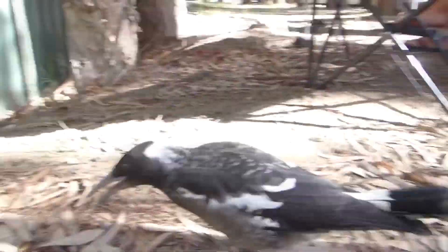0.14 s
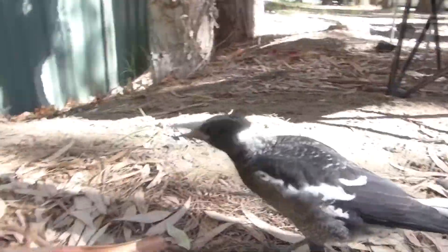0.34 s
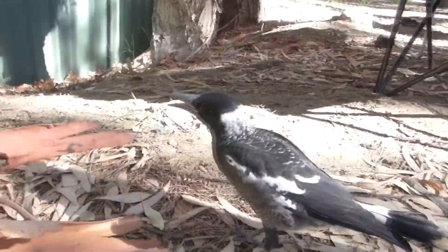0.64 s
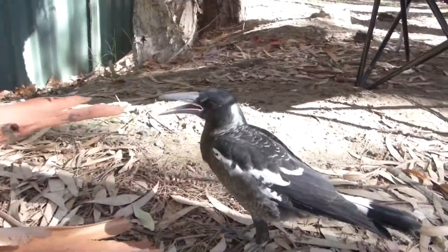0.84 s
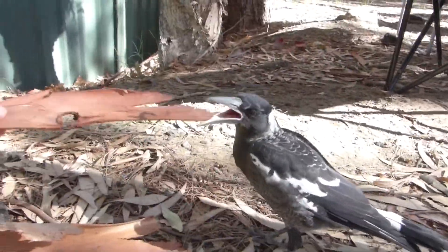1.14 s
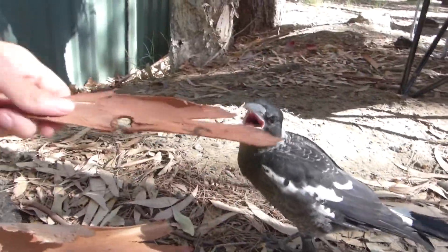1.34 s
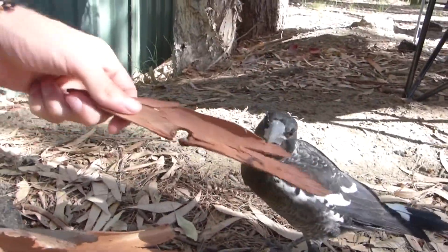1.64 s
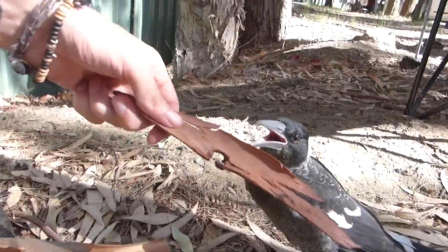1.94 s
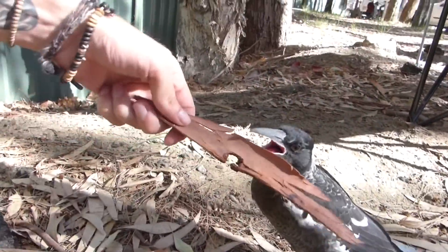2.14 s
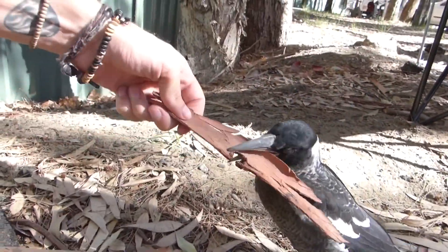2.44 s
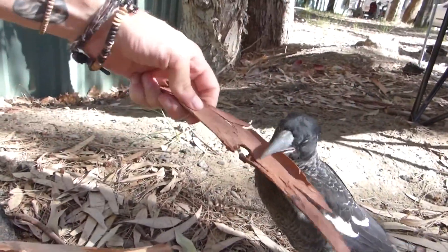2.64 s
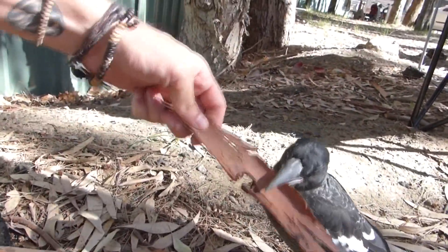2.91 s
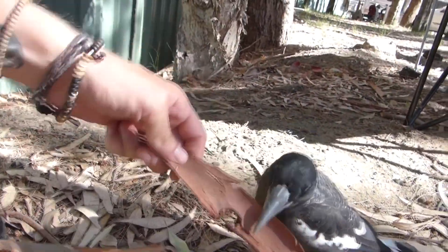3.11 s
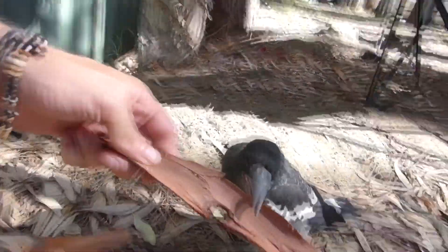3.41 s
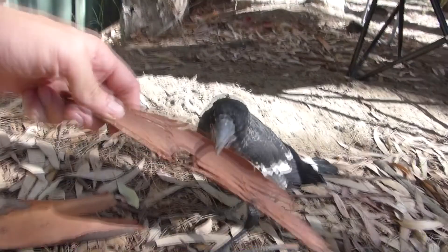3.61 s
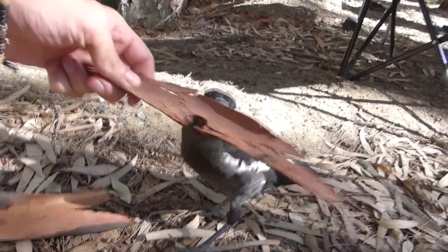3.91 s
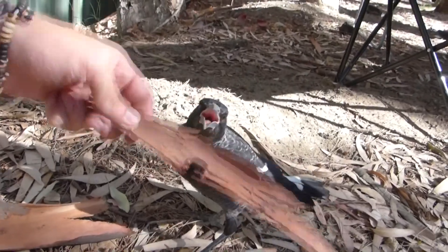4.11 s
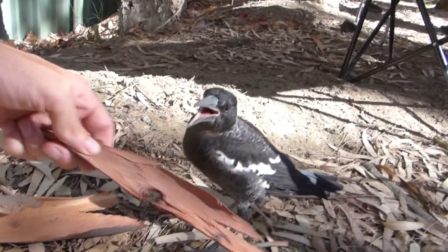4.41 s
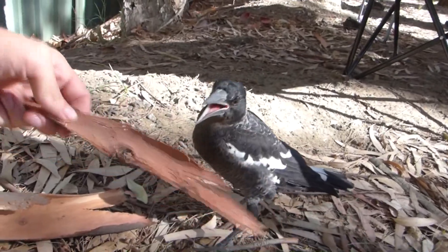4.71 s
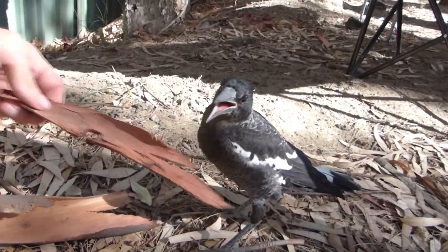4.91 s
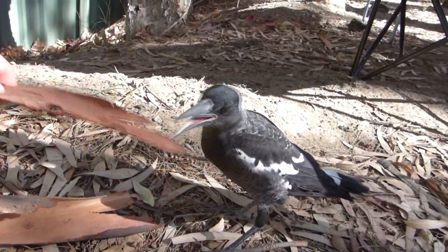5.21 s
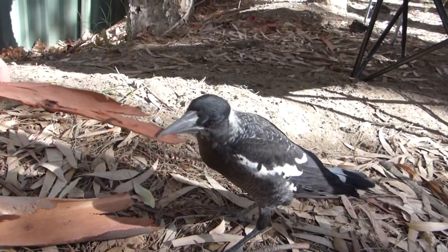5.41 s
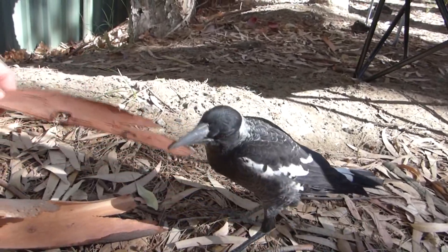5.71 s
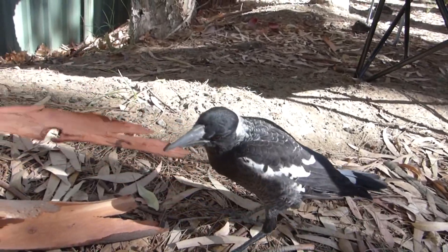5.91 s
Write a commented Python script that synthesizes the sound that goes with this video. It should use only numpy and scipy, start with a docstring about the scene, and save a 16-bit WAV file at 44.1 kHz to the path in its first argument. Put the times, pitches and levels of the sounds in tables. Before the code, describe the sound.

A young magpie gives eight hoarse, whining squawks over crackling dry leaves, with bark scrapes, beak snaps and rough close rubbing midway.

```python
"""Dry leaf litter crackles and stirs over a quiet outdoor hum, then a young magpie squawks eight times
at a strip of bark held out to it. Each squawk starts as a hoarse rasp and may clear into a bright harmonic
tone: chaotic pulses and puffs through the windpipe give way to summed harmonics. Bark scrapes over feathers
in short friction noises, the beak snaps in sharp bursts from midway on, and soon after the first snaps
uneven slips make a rough rubbing close by. Leaf cracks recur until just before the seventh squawk."""
import sys
import numpy as np
from scipy import signal
from scipy.fft import rfft, irfft, next_fast_len
from scipy.io import wavfile
from scipy.ndimage import uniform_filter1d, map_coordinates

SR = 44100
rng = np.random.default_rng(int(sys.argv[2]) if len(sys.argv) > 2 else 0)


def log_audio(samples):
    """Write samples as a 16-bit WAV file to the path given in sys.argv[1]."""
    # one column per channel
    frames = np.atleast_2d(samples).T
    # limit to full scale, then quantise
    limited = np.clip(frames, -1, 1)
    pcm = np.round(limited * 32767).astype(np.int16)
    wavfile.write(sys.argv[1], SR, pcm)


N = 266981
TIME = np.arange(N) / SR
EARS = np.array([[1], [-1]])   # left, right


def from_db(db):
    """Decibels to gain."""
    return 10 ** (np.asarray(db) / 20)


def rms_one(x):
    """Scale to unit power."""
    return x / np.sqrt(np.mean(x ** 2) + 1e-20)


def gate(t, start, end, edge):
    """Open from start to end, with short ramps."""
    opening = np.clip((t - start) / edge + .5, 0, 1)
    return opening * np.clip((end - t) / edge + .5, 0, 1)


def ease(x):
    """A smooth step from 0 to 1."""
    return np.sin(np.pi / 2 * np.clip(x, 0, 1)) ** 2


def swell(t, s, rise, fade):
    """A bell-shaped swell that peaks at s."""
    return np.exp(-np.minimum(((t - s) / np.where(t < s, rise, fade)) ** 2, 40))


def strokes(rows):
    """Overlapping swells (peak_s, level_db, rise_s, fade_s) add up in power."""
    return np.sqrt(sum((from_db(db) * swell(TIME, s, rise, fade)) ** 2 for s, db, rise, fade in rows))


def band(x, low_hz, high_hz, order=2):
    """Butterworth band-pass, its edges kept inside the audible range and below half the sample rate."""
    edges = [max(low_hz, 20), min(high_hz, SR / 2 - 500)]
    return signal.sosfilt(signal.butter(order, edges, "band", fs=SR, output="sos"), x)


def colour(x, spectrum):
    """Shape a sound with a spectrum drawn smoothly over log frequency."""
    hz, db = np.transpose(spectrum)
    size = next_fast_len(x.shape[-1])
    log_hz = np.log(np.arange(size // 2 + 1) * SR / size + 1)
    gain = from_db(np.interp(log_hz, np.log(hz), db))
    return irfft(rfft(x, size) * gain, size)[..., :x.shape[-1]]


def resonate(x, hz, width):
    """One resonance with gain 1 on top."""
    r = np.exp(-np.pi * width / SR)
    feedback = [1, -2 * r * np.cos(2 * np.pi * hz / SR), r * r]
    return signal.lfilter(np.array([1, 0, -1]) * (1 - r * r) / 2, feedback, x)


def wander(rate, t):
    """Smooth chance of unit power that changes about rate times a second."""
    since = t - t[0]
    knots = rng.standard_normal(int(since[-1] * rate) + 4)
    return rms_one(map_coordinates(knots, [since * rate + 1], order=2, mode="nearest"))


def stereo_noise(width, size=N):
    """White noise with some difference between the ears."""
    mid, side = rng.standard_normal((2, size))
    return mid + width * side * EARS


def level_of(x):
    """Running rms over 15 ms."""
    return np.sqrt(np.abs(uniform_filter1d(x * x, int(.015 * SR))) + 1e-12)


def background(air_db=-47.5, hum_db=-2):
    """Faint open-air noise, alike in both ears in the bass, and a far wavering hum of steady-level tones."""
    # open-air spectrum: hz, relative density_db
    air_spectrum = [(18, -64), (30, -25), (58, -24), (79, -16), (124, -1.5), (157, -5), (194, -1),
                    (499, -11), (540, -6.5), (600, -8), (1590, -15), (2120, -23), (6900, -24.5),
                    (7870, -22.5), (16000, -37.5)]
    # hum tones: pitch_hz, level_db before the common hum gain
    hum_tones = [(94, -60.5), (119, -60.5), (188, -57)]
    mid, side = rng.standard_normal((2, N))
    air = rms_one(colour(mid + 0.8 * band(side, 300, 18000) * EARS, air_spectrum))
    hum = 0
    for hz, db in hum_tones:
        phase = 2 * np.pi * hz * TIME + 2.2 * wander(9.1, TIME)
        hum = hum + from_db(db) * np.sqrt(2) * np.cos(phase)
    return from_db(air_db) * air + from_db(hum_db) * hum


def outdoors(x, echo_db=-25, decay_s=0.034):
    """Trunks, ground and a shed wall scatter a faint short echo, different in each ear."""
    t = TIME[:SR // 3]
    scatter = band(rng.standard_normal((2, len(t))), 510, 5100, order=1)
    scatter = scatter * np.exp(-t / decay_s) * (t > .002)
    scatter = scatter / np.sqrt(np.sum(scatter ** 2) / 2)
    return x + from_db(echo_db) * signal.fftconvolve(x, scatter, axes=1)[:, :N]


def litter(grain_db=2.5, gain_db=-1.5):
    """Clumps of tiny crackles as the leaves shift: noise in wildly uneven grains."""
    # litter stirred by feet and bark: peak_s, level_db before gain_db, rise_s, fade_s
    stirs = [(0.015, -39.5, 0.041, 0.3), (0.195, -38, 0.0045, 0.15), (0.835, -37, 0.0045, 0.041),
             (1.035, -41, 0.13, 0.04), (3.89, -45.5, 0.12, 0.33), (4.026, -32, 0.058, 0.011)]
    # spectrum of the leaves: hz, relative density_db
    leaf_spectrum = [(240, -28), (400, -1), (543, -31), (595, -17), (663, 4.5), (1240, -1.5), (1450, -8),
                     (1710, 1.5), (2550, -2.5), (5310, 5), (8930, 3), (15500, -12)]
    unevenness_db = grain_db * wander(540, TIME) + 0.5 * wander(78, TIME)
    grains = stereo_noise(0.54) * from_db(unevenness_db)
    return from_db(gain_db) * strokes(stirs) * rms_one(colour(grains, leaf_spectrum))


def cracks(decay_s=0.0043, spread=1.11):
    """A dry leaf breaks with a brief burst around its own pitch."""
    # breaking leaves: start_s, level_db of the burst at its start before the final filter, centre_hz
    breaks = [(0.085, -37, 5310), (0.191, -29.5, 4050), (0.2237, -29.5, 5400), (0.277, -39, 5450),
              (0.296, -35, 5390), (0.6004, -49, 2380), (0.8095, -37.5, 1930), (0.834, -43.5, 5280),
              (0.8544, -38, 3100), (0.891, -35, 7600), (1.6886, -41, 8040), (1.7365, -38.5, 7850),
              (1.754, -36.5, 8100), (3.1642, -36, 4000), (3.9714, -30, 4850), (4.189, -43, 7760),
              (4.773, -43, 6300)]
    out, t = np.zeros((2, N)), TIME[:SR // 20]
    for s, db, hz in breaks:
        burst = rms_one(band(stereo_noise(0.33, size=len(t)), hz / spread, hz * spread, order=1))
        first = int(s * SR)
        out[:, first:first + len(t)] += from_db(db) * burst * np.exp(-t / decay_s)
    return band(out, 900, 11600, order=3)


def scrapes(grain_db=3.5):
    """Each stroke swells and fades, a grainy friction noise around one pitch."""
    # short scrapes and scuffs: peak_s, length_s from the peak to 1/e^2, level_db of the band,
    # centre_hz, width_hz
    scuffs = [(0.098, 0.047, -43.5, 1290, 1150), (1.008, 0.057, -40, 3400, 974),
              (0.993, 0.17, -47, 523, 302), (1.097, 0.072, -28.5, 816, 169),
              (1.108, 0.069, -32.5, 1500, 400), (1.816, 0.025, -49, 8360, 1800),
              (1.88, 0.021, -43.5, 8300, 2600), (2.713, 0.039, -40, 6400, 7450),
              (2.865, 0.035, -34, 9610, 1400), (3.324, 0.038, -37, 8200, 1000),
              (3.387, 0.03, -33.5, 7700, 1800), (3.436, 0.033, -31, 5400, 6000),
              (3.449, 0.013, -26, 6900, 1000), (3.544, 0.034, -29.5, 7200, 1600),
              (3.604, 0.017, -29.5, 7200, 1400), (3.716, 0.024, -24.5, 6700, 910),
              (3.937, 0.11, -44.5, 990, 610)]
    out, friction = 0, stereo_noise(0.32) * from_db(grain_db * wander(500, TIME))
    for s, length, db, hz, width in scuffs:
        envelope = np.exp(-2 * np.minimum(((TIME - s) / length) ** 2, 20))
        core = rms_one(band(friction, hz - width / 2, hz + width / 2) + 0.22 * resonate(friction, hz, 2 * width))
        out = out + from_db(db) * envelope * core
    return out


def rub(slip_db=2.0, body_gain_db=3, hiss_gain_db=2, pan_db=4):
    """Uneven slips drive a hollow low flutter and a thin hiss, close by and a little to the left."""
    # rubbing strokes: peak_s, flutter level_db and hiss level_db (both before their gains), rise_s, fade_s
    rubbing = [(2.959, -33, -38.5, 0.067, 0.17), (2.958, -36, -47, 0.013, 0.013),
               (3.15, -40, -45, 0.045, 0.25), (3.4, -38.5, -46.5, 0.075, .03)]
    # resonances of the hollow flutter: centre_hz, width_hz, relative level_db
    body_modes = [(194, 53, -5), (464, 115, 1), (750, 124, 5.5)]
    # resonances of the hiss: centre_hz, width_hz before the two stages widen it, relative level_db
    hiss_modes = [(3910, 650, 3.5), (6750, 210, -3), (8200, 330, -3), (10700, 990, 1.5)]
    body_level = strokes((s, db + body_gain_db, rise, fade) for s, db, _, rise, fade in rubbing)
    hiss_level = strokes((s, db + hiss_gain_db, rise, fade) for s, _, db, rise, fade in rubbing)
    slips = stereo_noise(0.1) * from_db(slip_db * wander(130, TIME))
    body = sum(from_db(db) * resonate(slips, hz, width) for hz, width, db in body_modes)
    body = rms_one(band(body, 160, 890, order=3))
    hiss = 0
    for hz, width, db in hiss_modes:
        hiss = hiss + from_db(db) * resonate(resonate(slips, hz, 1.4 * width), hz, 1.3 * width)
    return (body_level * body + hiss_level * rms_one(hiss)) * from_db(pan_db / 2 * EARS)


def snaps(decay_s=0.0015, tail_decay_s=0.024, tail_db=-20, gain_db=1):
    """A hard contact of beak or bark: one sharp burst and a short tail."""
    # beak snaps and knocks on the bark: start_s, level_db before gain_db and the final filter
    contacts = [(2.61, -29), (2.705, -19.5), (3.395, -34), (4.023, -23)]
    # spectrum of a contact: hz, relative density_db
    contact_spectrum = [(180, -51), (300, -35.5), (577, -4), (1400, 0.5), (1730, -2), (3020, -6.5),
                        (3270, -18), (4620, 0.5), (6000, -19), (8460, -20), (8880, -10.5), (11700, -21),
                        (15000, -56.5)]
    out, t = np.zeros(N), TIME[:SR // 10]
    envelope = np.exp(-t / decay_s) + from_db(tail_db) * np.exp(-t / tail_decay_s)
    for s, db in contacts:
        burst = rms_one(colour(rng.standard_normal(len(t)), contact_spectrum)) * envelope
        first = int(s * SR)
        out[first:first + len(t)] += from_db(db + gain_db) * burst
    return band(out, 470, 11500)


def windpipe(x, resonances, neck, t, width_hz=300, widening=0.062, leak_db=-26, sway_db=2.0):
    """Side-by-side resonances with deep valleys between them; they slide with the neck and sway a little."""
    out = from_db(leak_db) * band(x, 7900, 11300)
    turns = np.cumsum(neck * (1 + .008 * wander(21.4, t))) / SR   # random sway of all resonances
    for hz, db in resonances:
        r = np.exp(-np.pi * (width_hz + widening * hz) / SR)
        centre = np.exp(2j * np.pi * hz * turns)
        # a double low-pass around the moving centre is a steep resonance
        ring = np.real(centre * signal.lfilter([(1 - r) ** 2], [1, -2 * r, r * r], x / centre))
        out = out + from_db(db + sway_db * wander(29.2, t)) * 2 * ring
    return band(out, 580, 25300, order=3)


def gesture(row, t, rise_shape=.75):
    """One squawk's course: pitch climbs, sags and drops, the rasp settles, the level swells and is released."""
    # the effort surges or eases: peak_s, half_length_s, pitch lift_hz, overtone gain_db,
    # resonance shift (added to the neck factor)
    pushes = [(0.405, 0.034, 0.5, 8, -0.023), (1.026, 0.0074, 0, -5.5, -0.021), (1.25, .06, 0.5, 2, 0.029),
              (1.337, 0.036, -0.5, 3, -0.029), (1.572, 0.11, 78.5, 0, -0.057),
              (2.143, 0.064, 56.5, -1.5, 0.011), (2.387, 0.074, -0.5, 6, 0.016), (2.741, 0.031, 0.5, -8, 0),
              (3.553, 0.066, -1.5, 4, -0.0041), (3.658, 0.0242, -11, -4.5, -0.052),
              (5.718, 0.026, -28.5, 3, -0.0086), (5.77, 0.036, 18.5, 1.5, 0.035),
              (5.866, 0.011, -2, 4.5, 0.012)]
    # the syrinx locks into a clearer tone: from_s, to_s, roughness (0-1), overtone gain_db
    clear_spells = [(1.18, 1.363, 0.43, 0.5), (1.497, 1.604, 0.05, -2), (2.336, 2.539, 0.04, -0.5),
                    (2.71, 2.863, 0.6, 2), (3.621, 3.9, 0.49, 0), (4.597, 4.74, 0.18, -2)]
    sag_hz_per_s, drop_s = 110, .04   # sag after the top, fall at the very end
    onset_roughness, lock_s = 0.94, 0.045   # lock_s: time to lock or let go
    attack_s, release_s, release_db = .004, 0.081, 20
    fundamental_db_per_octave = 12.5   # a higher fundamental carries better
    (start, end, first_hz, top_hz, rise, drop_hz, base_db, base_slope, throat_db, bright_db, slope,
     settled, settling, neck, slide, _) = row
    age, left, from_middle = t - start, end - t, t - (start + end) / 2

    pitch = first_hz + (top_hz - first_hz) * ease(age / rise) ** rise_shape
    pitch = pitch - sag_hz_per_s * np.maximum(age - rise, 0)
    pitch = pitch - drop_hz * np.clip(1 - left / drop_s, 0, 1)
    rough = onset_roughness + (settled - onset_roughness) * ease(age / settling)
    overtone_db = slope * from_middle
    neck = neck + slide * from_middle
    for s, length, lift_hz, db, shift in pushes:
        push = swell(t, s, length, length)
        pitch = pitch + lift_hz * push
        overtone_db = overtone_db + db * push
        neck = neck + shift * push
    for begin, finish, locked_rough, db in clear_spells:
        locked = gate(t, begin, finish, lock_s)
        rough = rough + (locked_rough - rough) * locked
        overtone_db = overtone_db + db * locked

    base_db = base_db + base_slope * from_middle + fundamental_db_per_octave * np.log2(pitch / top_hz)
    fade_db = release_db * np.clip(1 - left / release_s, 0, 1) ** 2
    envelope = gate(t, start, end, attack_s) * from_db(-fade_db)
    levels = envelope * from_db([base_db, throat_db + overtone_db, bright_db + overtone_db])
    return pitch, np.clip(rough, 0, 1), neck, levels


def squawk(row, tone, resonances, t, jitter=0.19, flutter=0.15, half_lines=0.43, rattle_db=3.0,
           waver=0.0097, clear_below=0.604, base_gain_db=1.0, smear=0.86):
    """The syrinx sings a clear tone, or beats chaotically and drives the windpipe with uneven pulses and puffs."""
    pitch, rough, neck, (base_level, throat_level, bright_level) = gesture(row, t)
    # some pitch waver (the .22) is left even in a clear tone
    wavering_pitch = pitch * (1 + waver * (rough + .22) * wander(112.8, t))
    phase = 2 * np.pi * np.cumsum(wavering_pitch) / SR
    phase = phase + jitter * rough * wander(600, t)   # early and late cycles smear high harmonics most
    phase = phase + smear * rough ** 4 * wander(111, t)   # in a full rasp the pitch itself breaks up
    strength = 1 + flutter * rough * wander(450, t)
    # the fundamental is left out here and added below at its own level
    clear = rms_one(sum(from_db(db) * np.cos(round(k) * phase + k * k / 2) for k, db in tone if k > 1.5))
    # strong and weak pulses alternate in fits, which puts lines between the harmonics
    pulses = rms_one(sum(np.cos(k * phase) for k in range(2, 19)))
    pulses = pulses * (1 + half_lines * (1 + 1.2 * wander(88.7, t)) * np.cos(phase / 2))
    # air escapes in a puff each cycle, in rattling bunches
    puffs = rng.standard_normal(len(t)) * (1 + 0.37 * np.cos(phase))
    puffs = rms_one(puffs * from_db(rattle_db * wander(420, t)))
    drive = np.sqrt(1 - rough ** 2) * strength * pulses + rough * puffs
    hoarse = rms_one(windpipe(drive, resonances, neck, t))
    hoarse_share = np.clip(rough / clear_below, 0, 1)
    voice = np.sqrt(1 - hoarse_share ** 2) * clear + hoarse_share * hoarse
    # the opening beak lets out more or less of the bright overtones
    low = signal.sosfiltfilt(signal.butter(6, 3500, fs=SR, output="sos"), voice)
    high = voice - low
    throat = throat_level * low / level_of(low)
    bright = bright_level * high / level_of(band(high, 3600, 6200, order=4))
    base = from_db(base_gain_db) * base_level * np.sqrt(2) * np.cos(phase) * strength
    return -(base + throat + bright)


def magpie(bounce_db=-12, bounce_s=0.001404):
    """The squawks one after another; their bounce off the ground reaches the ears with opposite sign."""
    # squawks: start_s, end_s, first_pitch_hz, top_pitch_hz, rise_s, final_drop_hz,
    # fundamental_db before its gain, its crescendo_db_per_s, throat_overtones_db, bright_overtones_db,
    # their crescendo_db_per_s, settled roughness (0-1), settling_s, neck (factor on all resonances),
    # neck slide (per s), left_minus_right_db; levels and neck hold for the middle of each squawk,
    # before pushes, clear spells and the fundamental's rise with pitch
    calls = [ (0.384, 0.723, 719, 796, 0.33, 105, -43.5, 53, -44, -46, 16, 0.33, 0.12, 1.033, -0.0092, 0.3),
             (1.038, 1.66, 616, 708, .198, 31, -36.5, 28.5, -32, -29, 16.5, 0.51, 0.13, 1.002, -0.023, 0.5),
             (1.932, 2.575, 695, 745.5, 0.12, 10, -37.5, 20, -34, -33, 31, 0.34, 0.86, 0.973, 0.1, -3),
             (2.742, 3.165, 646, 764, .27, 7, -38, 0, -38, -37.5, -20, 0.95, .1, 0.98, -0.13, -1.7),
             (3.41, 3.894, 779, 936.4, 0.34, 66, -31.5, 13, -34.5, -41.5, 11.5, 0.4, 0.41, 1, 0.084, 0.7),
             (4.338, 4.7, 748, 933.7, .215, 61, -34.5, 5.5, -39.5, -37.5, 1, 0.59, 0.1, 0.993, 0.021, .5),
             (4.956, 5.257, 720, 975, .24, 30, -33.5, 3, -39.5, -35, -1, 0.71, 0.13, 1.008, 0.047, 0),
             (5.395, 5.95, 699, 897.5, 0.33, 313, -32, 5, -34, -36.5, 0.5, 0.62, 0.21, 0.98, 0.041, 1.4), ]
    # clear tone of each squawk: multiple of the pitch, relative level_db
    clear_tones = [
        [(1, 0), (2, 5), (3, 8.5), (4, 1), (5, 1), (6, 3), (7, -16), (8, -22), (9, -28), (10, -29)],
        [(1, 0), (2, 18.5), (3, 22.5), (4, 15), (5, 3), (6, 6.5), (7, 8.5), (8, 0.5), (9, 3), (10, 1), (11, -1),
         (12, 3.5), (13, 1), (14, -7), (15, -4), (16, -13), (17, -16), (18, -13)],
        [(1, -9), (2, 12), (3, 9.5), (4, -0.5), (5, -12), (6, -3.5), (7, -11), (8, 0), (9, -4), (10, -6),
         (11, -6), (12, -8), (13, -21), (14, -16.5), (15, -24), (16, -24), (17, -37), (18, -30)],
        [(1, -2), (2, 10), (3, -10), (4, -13), (5, -12), (6, -7), (7, -10), (8, 12)],
        [(1, 0), (2, -25), (3, -36), (4, -20), (5, -36), (6, -11.5), (7, -11), (8, -4), (9, -3.5), (10, -16),
         (11, -21), (12, -22)],
        [(1, 0), (2, 14), (3, -1), (4, -1), (5, 4), (6, -7), (7, -5), (8, -3), (9, -22), (10, -11), (11, -34),
         (12, -24), (13, -32)],
        [(1, 0), (2, 2), (3, 4), (4, -6), (5, -6), (6, -14), (7, -13), (8, -18)],
        [(1, 0), (2, -5.5), (3, 7.5), (4, -9), (5, -7.5), (6, -8.5), (7, -24.5), (8, -6.5)],
    ]
    # resonances of windpipe and beak in each squawk: centre_hz before the neck factor, relative level_db
    pipe_modes = [
        [(1430, 9.5), (2380, 0), (2940, 3), (4030, 4.5), (4790, 7.5), (6540, -2), (7050, -4), (7920, -2),
         (9390, -9), (10660, -20), (11530, -33), (12070, -29), (12550, -32)],
        [(1400, 0.5), (2100, -5), (2480, -1), (3210, -2.5), (4180, 4), (4930, 0), (5610, 1.5), (6350, -1),
         (7030, -6), (7570, -5), (8480, -6), (9180, -29), (9680, -11), (10310, -35), (12970, -21)],
        [(1430, 14.5), (2170, 11), (2910, 8.5), (3570, 3), (4140, 3.5), (4580, 5.5), (5170, 3.5), (5740, 2.5),
         (6450, -6), (7060, -17), (8310, -7), (8790, -10.5), (9920, -14), (10510, -16), (12440, -22)],
        [(1350, 3.5), (2030, -0.5), (2970, -2.5), (3470, -1), (4080, 5), (5290, 7.5), (6260, 3.5), (6880, 2.5),
         (8120, 0), (8770, -3), (9840, -5), (10480, -7.5), (11180, -19)],
        [(1290, -1.5), (1830, -2), (2800, -7), (3640, -2), (4740, -4), (5590, 3), (6370, 2.5), (7310, -4),
         (8400, 0.5), (9150, -5.5), (9960, -4.5), (10670, -12), (11220, -22), (11800, -29), (12590, -32)],
        [(1310, -4), (1790, -5.5), (2530, -9), (3070, -3.5), (3760, -6), (4580, 2), (5070, 1.5), (5680, -1),
         (6490, -3.5), (6970, -4.5), (8160, -13), (8670, -6), (9600, -11), (10250, -21), (10730, -29),
         (11260, -27)],
        [(1420, -7.5), (1910, -9), (2920, -8), (4470, 4), (5760, 1), (6800, -2), (8270, -7), (8970, -3.5),
         (9600, -14), (10240, -12), (10840, -26), (11770, -22), (12680, -31)],
        [(1380, 1), (2100, -4), (2660, 5.5), (3430, -4.5), (3980, -4.5), (5000, -6), (5810, -11), (7030, -10.5),
         (8240, -13.5), (8830, -16), (9400, -16), (9870, -30), (10950, -27), (11840, -43), (12370, -42)],
    ]
    out = np.zeros((2, N))
    for row, tone, resonances in zip(calls, clear_tones, pipe_modes):
        start, end, *_, pan_db = row
        span = (TIME > start - .02) & (TIME < end + .02)
        out[:, span] += squawk(row, tone, resonances, TIME[span]) * from_db(pan_db / 2 * EARS)
    delayed = np.roll(out.mean(axis=0), round(bounce_s * SR))
    bounce = from_db(bounce_db) * band(delayed, 3200, 14000, order=1)
    return out + bounce * EARS


def scene():
    """Bird, bark and leaves with the echo of the place; the close rubbing and the background stay without it."""
    echoing = litter() + cracks() + scrapes() + snaps() + magpie()
    return background() + outdoors(echoing) + rub()


def record(dry):
    """The microphone dulls the highest treble, then the top is cut steeply."""
    dull = signal.sosfilt(signal.butter(3, 14000, fs=SR, output="sos"), dry)
    return signal.sosfilt(signal.ellip(10, .1, 80, 15800, fs=SR, output="sos"), dull)


dry = scene()
out = record(dry)
log_audio(out)
```